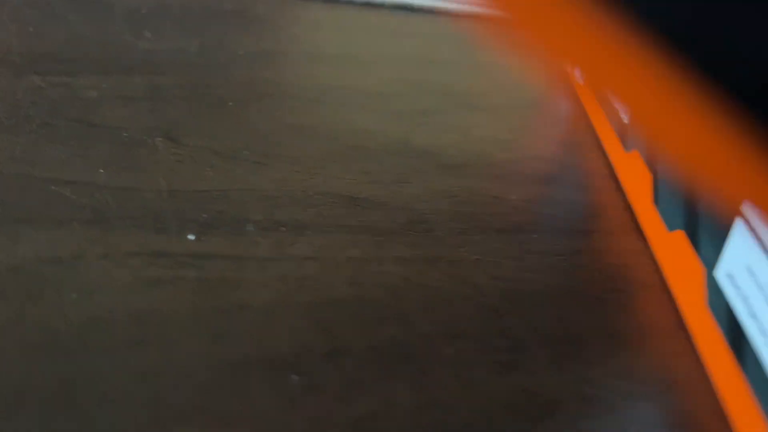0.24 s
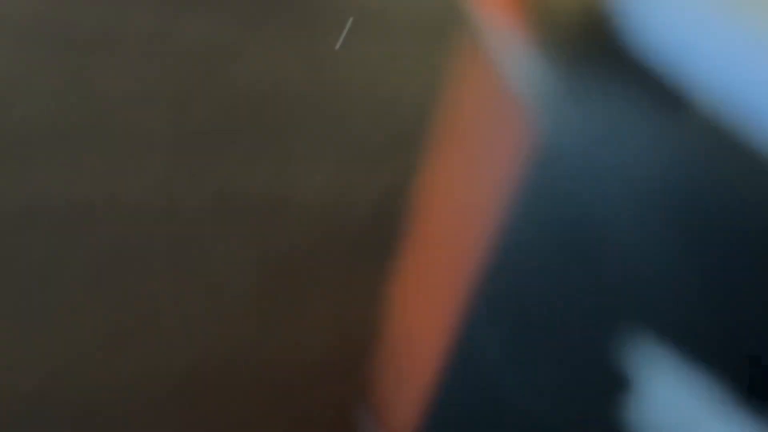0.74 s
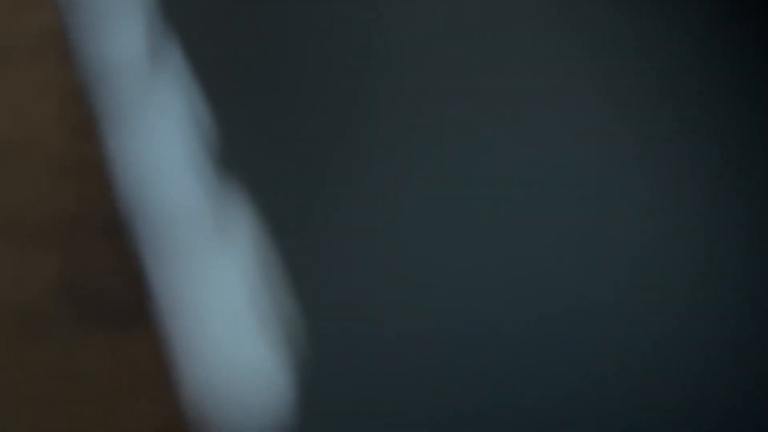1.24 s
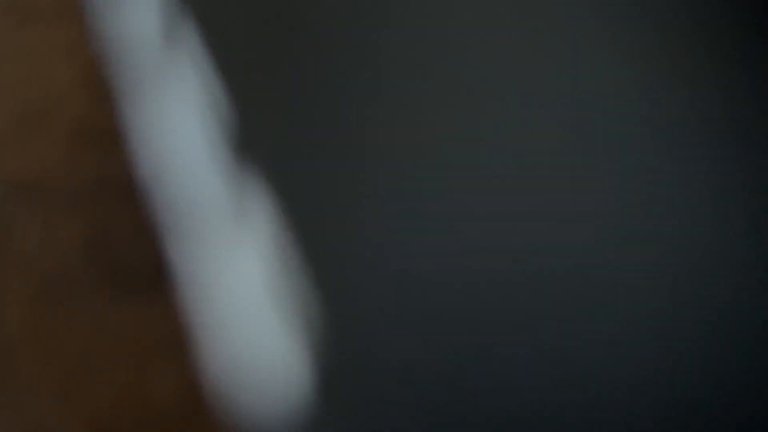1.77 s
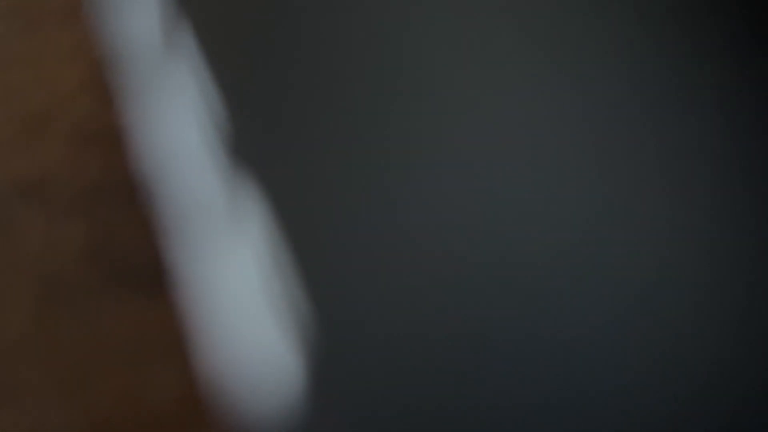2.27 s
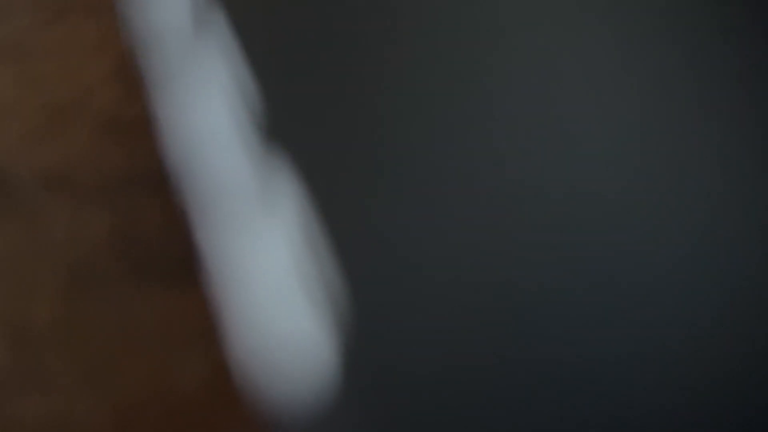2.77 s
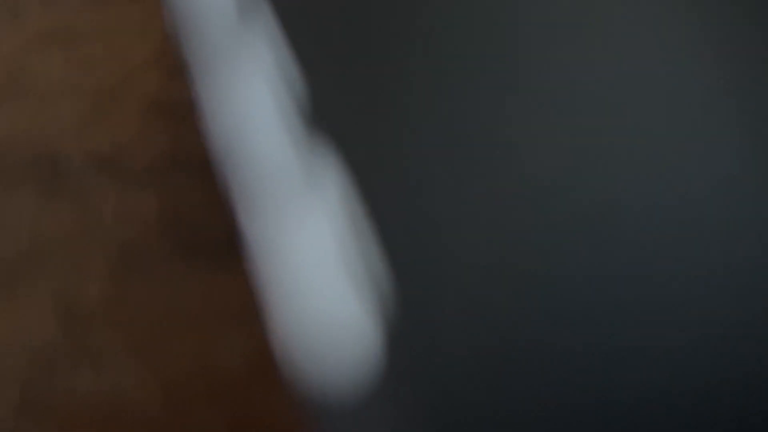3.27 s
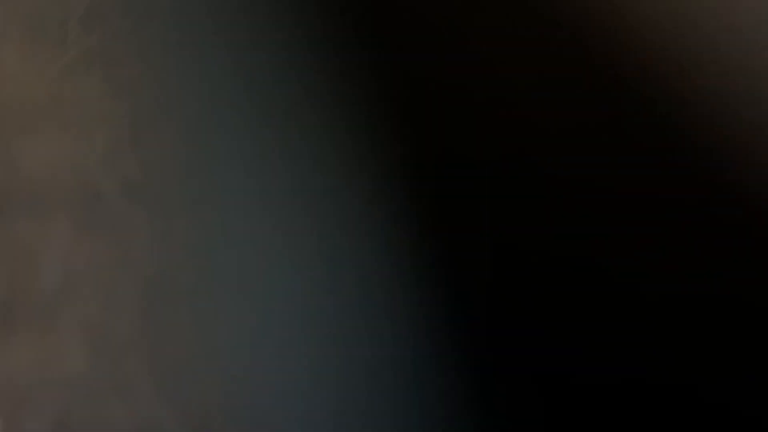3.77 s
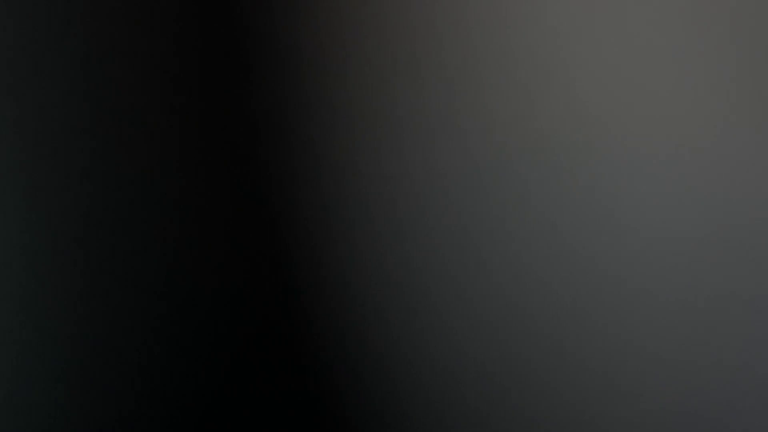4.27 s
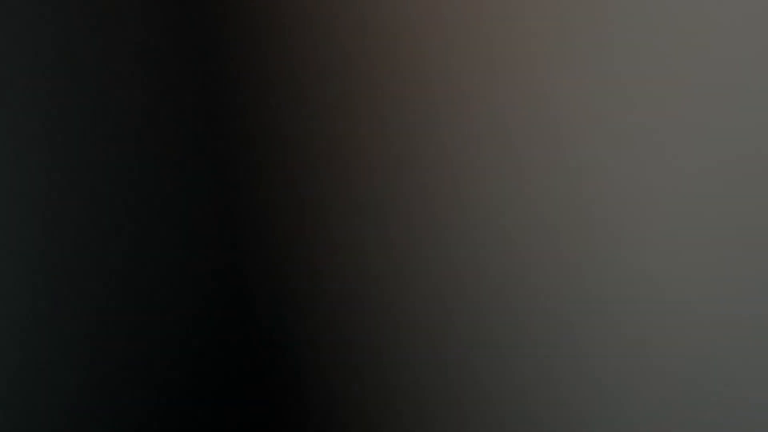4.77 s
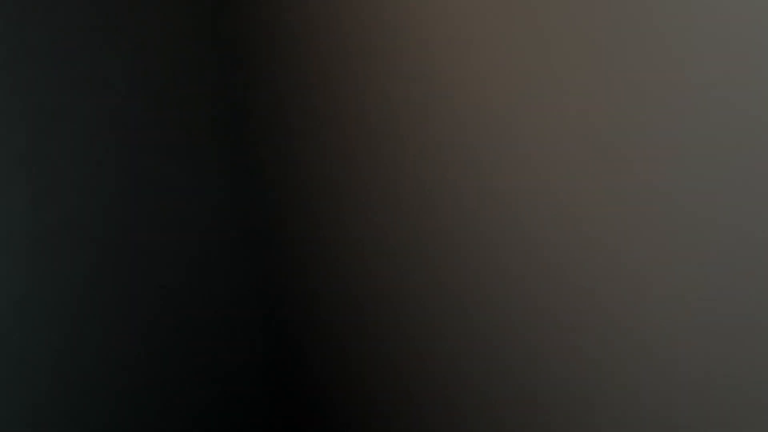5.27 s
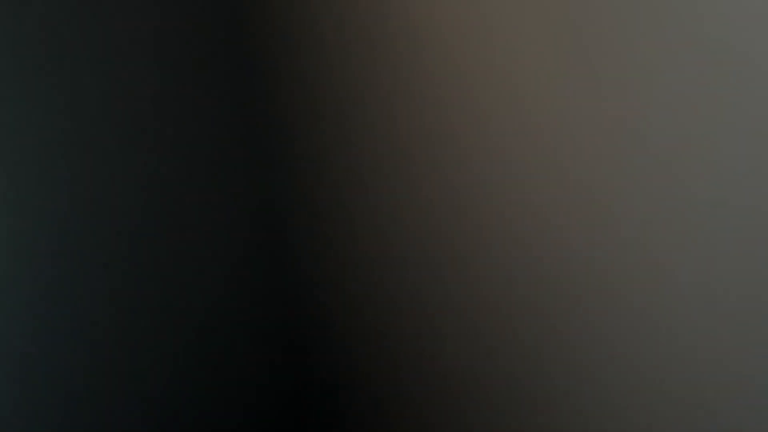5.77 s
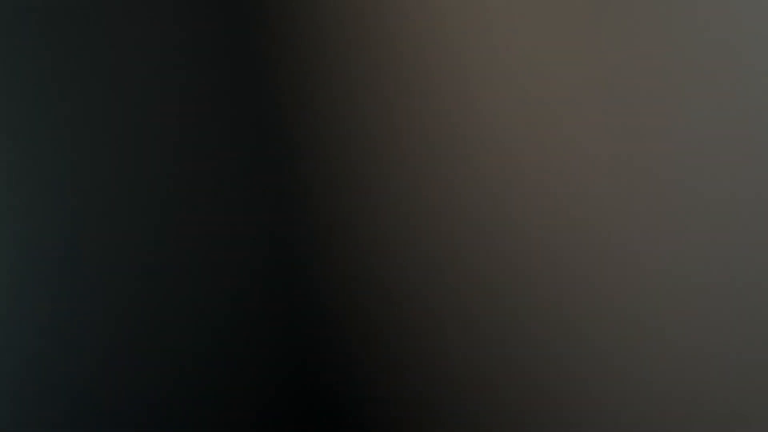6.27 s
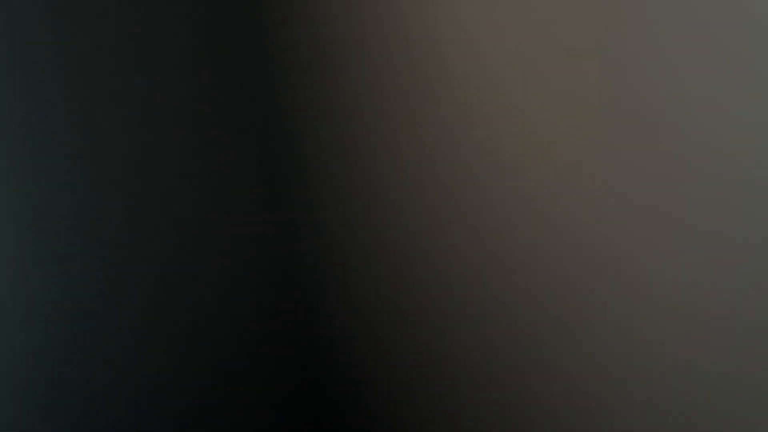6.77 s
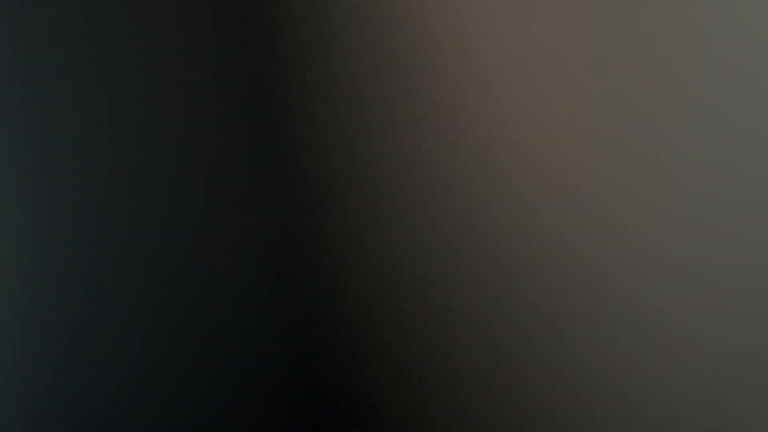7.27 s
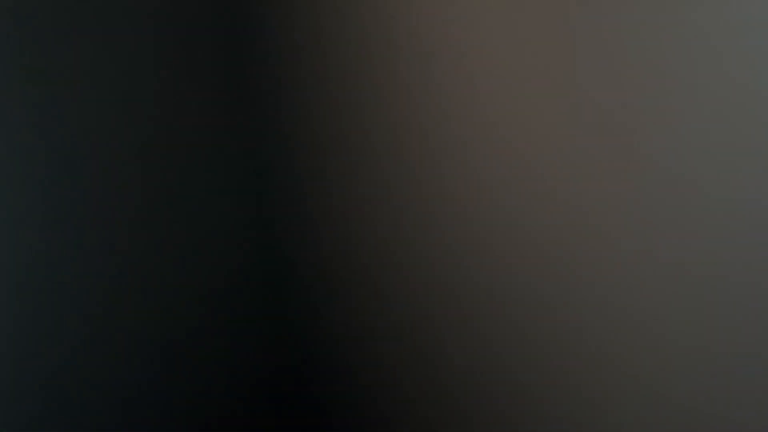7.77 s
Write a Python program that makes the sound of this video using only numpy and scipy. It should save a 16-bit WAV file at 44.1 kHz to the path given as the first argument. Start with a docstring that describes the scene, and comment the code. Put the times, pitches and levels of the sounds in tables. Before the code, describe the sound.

A cardboard box is shoved and knocked shut, then a felt marker rubs short squeaky-dry strokes on it, with soft panel taps between.

```python
"""Felt marker on a cardboard box

A felt marker writes short strokes on a cardboard box, right beside the microphones, in a quiet room.
First the box is slid into place and its lid knocks shut; between strokes the hand shifts and panels flex and tap.
Rubbing is noise shaped by felt, card and panel; taps cross the board treble first, as quick downward chirps."""
import sys
import numpy as np
from scipy import signal
from scipy.fft import rfft, irfft, next_fast_len
from scipy.io import wavfile
from scipy.ndimage import map_coordinates

SR = 44100
rng = np.random.default_rng(int(sys.argv[2]) if len(sys.argv) > 2 else 0)


def unload_wav(signal):
    """Save mono or channel-first audio to the path in sys.argv[1] as 16-bit WAV at rate SR, clipped to [-1, 1]."""
    wavfile.write(
        sys.argv[1],
        SR,
        np.round(np.clip(np.atleast_2d(signal).T, -1, 1) * 32767).astype(np.int16),
    )


N = 354123  # length of the sound [samples]

# strokes of the marker: (start [s], length [s], share of the length at top speed [0-1], panel ring [dB],
# felt hiss [dB], flexing [dB], upper modes against lower modes [dB])
MARKER_STROKES = [(2.462, 0.12, 0.14, -53.5, -76, -60, -13), (2.561, 0.16, 0.29, -40.5, -46.5, -52.5, -5),
                  (2.728, 0.11, 0.13, -33.5, -42, -53, -9), (2.772, .11, 0.54, -37, -56.5, -48, -6),
                  (2.889, 0.26, 0.38, -39, -45, -56, -4.5), (3.031, .17, 0.61, -34.5, -40, -57, -2),
                  (3.66, 0.081, 0.48, -39.5, -50.5, -43.5, -3.5),
                  (3.745, 0.14, .46, -34, -45.5, -43.5, -2.5), (3.826, 0.22, 0.47, -39, -48, -51.5, -7.5),
                  (3.961, 0.17, 0.7, -36, -43.5, -50, -1.5), (4.689, .12, 0.93, -45.5, -66, -54, -1),
                  (4.815, 0.11, .31, -40, -47, -51.5, 3.5), (4.933, 0.087, 0.28, -36, -51.5, -56, -5),
                  (4.985, 0.16, 0.55, -39, -55.5, -53.5, -7.5), (5.264, 0.13, 0.5, -38.5, -47.5, -42.5, 2),
                  (5.606, 0.17, .67, -38.5, -51.5, -55, -2.5), (5.803, 0.1, 0.25, -35.5, -39.5, -44, 2.5),
                  (6.145, 0.16, 0.4, -34.5, -45, -54, 1.5), (6.302, 0.13, .28, -38, -46, -51.5, 3),
                  (6.58, 0.13, 0.37, -40.5, -54, -54, 4), (6.852, 0.11, 0.32, -43, -56.5, -50, 2),
                  (6.981, 0.12, .15, -34, -53, -54, -2), (7.056, 0.15, .44, -40.5, -47, -54.5, 3.5),
                  (7.145, .185, 0.47, -35, -44.5, -48.5, 2.5), (7.835, .25, 0.39, -35.5, -37.5, -46.5, 0.5)]
# pushes of the box and brushes of the hand: (start [s], length [s], share of the length at top speed [0-1],
# scrape [dB], hiss [dB], flexing [dB])
BOX_SLIDES = [(0, 0.11, 0.053, -51.5, -58, -47), (0.148, 0.1, 0.38, -52.5, -56, -44.5),
              (0.285, 0.096, 0.29, -44, -49, -32.5), (.39, 0.32, 0.076, -50.5, -59.5, -49),
              (0.559, 0.2, 0.37, -47, -52.5, -40.5), (0.69, 0.24, .1, -43, -45, -50.5),
              (0.786, 0.19, 0.84, -45, -43.5, -45.5), (1.047, 0.097, 0.59, -54, -77, -43),
              (1.137, 0.49, 0.33, -60.5, -81.5, -64), (1.387, 0.078, 0.66, -41, -56.5, -47.5),
              (1.463, 0.17, 0.46, -43.5, -49, -49.5), (1.684, 0.23, 0.16, -56.5, -71, -56.5),
              (3.203, 0.11, 0.34, -51, -59.5, -43.5), (3.264, 0.091, 0.48, -41.5, -52, -58),
              (3.388, 0.079, 0.29, -53.5, -62.5, -46), (3.47, .15, 0.48, -44.5, -63.5, -45.5),
              (4.116, 0.072, 0.17, -42, -64.5, -49.5), (4.195, 0.16, 0.44, -41, -51.5, -45),
              (4.435, 0.2, 0.19, -52.5, -88, -56), (5.437, .07, .3, -56, -82, -57),
              (5.885, 0.067, 0.31, -44, -72, -42), (7.32, 0.11, 0.13, -49, -63, -55),
              (7.436, 0.089, 0.2, -46, -61, -44), (7.557, 0.27, 0.96, -64, -83, -54.5)]
# taps on the board: (arrival of the 1 kHz wave [s], thud peak [dB], thud centre [Hz], crack peak [dB],
# travel time of the 1 kHz wave [s])
BOARD_TAPS = [(0.004, -25, 204, -36.5, 0.0036), (0.2511, -25.5, 260, -27, 0.006),
              (0.3084, -18, 380, -37, 0.0085), (0.3405, -27, 430, -47, 0.005),
              (0.4069, -30, 90, -27.5, 0.0058), (0.4229, -26.5, 90, -51, 0.006),
              (0.458, -30.5, 364, -36, 0.0035), (0.5819, -19.5, 470, -22, 0.005),
              (0.589, -25, 91, -28, 0.0034), (0.7022, -11.5, 565, -9.5, 0.00095),
              (0.7122, -9, 257, -20.5, 0.0045), (0.7211, -20.5, 250, -22.5, 0.00099),
              (1.029, -34, 300, -35.5, 0.0019), (1.045, -26.5, 150, -49, 0.0039),
              (1.075, -35, 87, -32.5, 0.004), (1.392, -30.5, 149, -39.5, 0.0045),
              (1.4403, -34, 510, -31, 0.0011), (1.5098, -31, 112, -40, 0.006),
              (1.7899, -31, 350, -58, 0.001), (2.1376, -44, 218, -53, 0.006),
              (2.4734, -34, 180, -45, 0.0028), (2.7375, -29.5, 597, -41, 0.0021),
              (2.985, -12.5, 355, -26, 0.0011), (2.991, -16, 358, -34, 0.0023),
              (2.995, -21.5, 360, -28, 0.006), (3.0033, -26, 430, -30, 0.0038),
              (3.0189, -20, 353, -41, 0.0045), (3.206, -37, 610, -35, 0.003),
              (3.2232, -34, 150, -44, 0.0045), (3.2472, -28.5, 130, -40, 0.0012),
              (3.282, -36, 90, -37, 0.002), (3.3637, -29.5, 300, -38, 0.003),
              (3.3747, -28, 210, -55, 0.0007), (3.3995, -34.5, 250, -57, 0.006),
              (3.4394, -34, 110, -47, 0.005), (3.5236, -26.5, 151, -43, 0.0028),
              (3.596, -31.5, 146, -35.5, 0.0045), (3.656, -28, 364, -44, 0.0045),
              (4.116, -36, 109, -48, 0.0041), (4.2136, -36, 130, -35, 0.00447),
              (4.4578, -37, 507, -59, 0.0034), (5.2668, -34, 250, -56, 0.0045),
              (5.2817, -29, 357, -49, 0.0045), (5.3757, -32.5, 298, -46, 0.0045),
              (5.537, -49, 210, -58, 0.006), (5.6054, -30, 302, -52, 0.0022),
              (5.8808, -30, 605, -38, 0.0068), (5.912, -30.5, 430, -42, 0.00294),
              (5.9445, -29, 356, -46, 0.004), (6.0688, -37.5, 300, -52, 0.0039),
              (6.1244, -28.5, 610, -51, 0.002), (6.584, -33.5, 253, -57, 0.00406),
              (6.835, -31, 213, -43.5, 0.0045), (6.9667, -27, 355, -38, 0.0031),
              (7.4288, -22.5, 610, -45, 0.00066), (7.4538, -33, 430, -36, 0.004),
              (7.4752, -16.5, 314, -30.5, 0.0029), (7.4834, -20.5, 149, -44, 0.00083),
              (7.7022, -27, 300, -43.5, 0.0045), (7.7522, -40, 207, -44, 0.0021),
              (7.7785, -21, 500, -50, 0.0039), (7.8127, -31, 610, -52, 0.00078),
              (7.8287, -33, 90, -45, 0.0065)]
# sharp ticks of cardboard edges and of the tip landing: (time [s], relative strength [dB])
EDGE_TICKS = [(0.2517, -31), (0.308, -36), (0.405, -29.5), (0.4548, -28.5), (0.5794, -19), (0.6999, -16.5),
              (1.0275, -45), (1.0733, -32.5), (1.2211, -51), (1.3908, -46), (1.82, -25), (2.4714, -46),
              (2.7345, -22), (3.2049, -30), (3.2235, -34), (4.1525, -42), (4.21, -37), (5.2674, -48),
              (5.512, -53), (5.8102, -32.5), (6.1564, -35), (6.5824, -42), (6.9662, -37.5), (7.3895, -48),
              (7.4278, -26), (7.449, -27), (7.4734, -20.5), (7.636, -41.5), (7.8265, -45)]
# where the box sits, for its taps and flexing: (time [s], left minus right [dB], delay of left taps [s])
BOX_PLACE = [(0, 5, .00018), (1.0, 5.5, .00018), (1.4, -1, 0), (2.6, -2, 0), (3.2, -.5, 0), (5.5, -2, 0),
             (8, -1.5, .00008)]
# narrow panel modes under the tip: (frequency [Hz], width [Hz], left [dB], right [dB])
PANEL_MODES = [(804.4, 34, 5, 14.5), (858, 23, 8, 15), (892.4, 10.6, 18.5, 10), (977, 16.4, 9, 17),
               (1082, 30, 14, 10), (1109.3, 47, 11.5, -2.5), (1202, 35, 4, 4.5), (1311, 34, 7, -29),
               (1323, 54, 7.5, -14.5), (1516, 66, 3, -6.5), (1980, 150, -6, -28.5), (2510, 150, -28, -10)]
# broad response of the board to felt friction: (frequency [Hz], left [dB], right [dB])
FELT_RING_COLOUR = [(100, -18, -8), (300, -5, -4.5), (505, -8.5, 2), (734, -22, -5.5), (1176, 1.5, 2),
                    (1660, -11.5, -10), (2130, -11, -14.5), (3050, -17.5, -22), (3920, -19.5, -27),
                    (8640, -45, -64.5)]
# colour of the felt's hiss: (frequency [Hz], left [dB], right [dB])
FELT_HISS_COLOUR = [(1210, -32.5, -10), (2530, 5.5, 5), (4250, -1.5, -4.5), (5020, 0, -3), (6660, 9.5, 2),
                    (7230, -1, -4), (8700, 5, 5), (10750, -8, -9), (10840, 3.5, -0.5), (14200, -4, -3.5),
                    (15660, -6, -9)]
# colour of the dull card scrape: (frequency [Hz], left [dB], right [dB])
CARD_SCRAPE_COLOUR = [(82.5, -17, -1.5), (357, -1.5, -4.5), (700, 2, 4), (1210, 6, 1), (1580, -1.5, -6),
                      (2160, -8, -8.5), (3345, -18, -20), (9070, -38, -43.5)]
# colour of the dry card hiss: (frequency [Hz], left [dB], right [dB])
CARD_HISS_COLOUR = [(1500, -20, -20), (3100, -7, -9), (4500, 0, -5), (5600, -1, -7), (7500, -2, -4),
                    (10000, -5, -5), (11700, -1, -1), (13500, -7, -7), (15400, -8, -8)]
# colour of the flexing panels: (frequency [Hz], level [dB])
FLEXING_COLOUR = [(20, -38.5), (40, -1.5), (60, 6), (120, 1), (250, -3), (450, -0.5), (700, -13.5),
                  (1500, -27), (4000, -69)]
# colour of the ticks: (frequency [Hz], gain [dB])
TICK_GAIN = [(300, 6), (1500, 4), (3500, 0.5), (8000, -3.5), (15000, -11)]
# colour of the quiet room's own sound: (frequency [Hz], level [dB])
AIR_COLOUR = [(20, -5), (50, 5.5), (90, -26), (128, 25.5), (190, -43), (400, -29.5), (800, -43),
              (2050, -17.5), (8000, -56.5), (16000, -89.5)]
# how long the room takes to fade by 60 dB: (frequency [Hz], time [s])
ROOM_FADE = [(100, 0.12), (1000, 0.25), (4000, 0.25), (14000, 0.085)]
# how alike left and right are before placing and recording: (frequency [Hz], correlation [0-1])
LEFT_RIGHT_ALIKE = [(60, 1), (300, 0.75), (1300, 0.41), (2800, 0.091), (6500, 0.41), (8500, 0.22),
                    (15000, 0.073)]
# phase of the shared treble between the channels: (frequency [Hz], phase [turns])
TREBLE_TWIST = [(8300, 0), (10250, .5), (12100, 1), (13950, 1.5), (15700, 2)]
# colour of the microphones' own hiss: (frequency [Hz], level [dB])
MIC_HISS_COLOUR = [(500, -2), (5000, 2.5), (9000, -3), (15000, -11)]

# how much weaker each sound is when the tip or card is nearly at rest [dB]
RING_SLOW_DB, FELT_SLOW_DB = 13.5, 26.5
SCRAPE_SLOW_DB, CARD_SLOW_DB, FLEX_SLOW_DB = 8.5, 12, 4
# every move takes hold quickly [s] and dies away after its end [dB/s]
CONTACT_S, RELEASE_DB_PER_S = 0.0058, 174.5
GRIP_DB = -62  # the holding hand never lets the flexing stop
# the panels settle after a tap: level against its thud [dB], and decay [dB/s]
SETTLE_DB, SETTLE_DB_PER_S = -20.5, 258.5
AIR_DB, MIC_HISS_DB, ROOM_DB = -63.5, -86, -20.0
SHARED_HZ, TOP_HZ = 8000, 15850  # treble above the first is shared by both sides; the band ends at the second


def marker(split_hz=1100):
    """The dragging felt hisses and sets the panel ringing; where it drags decides which modes ring most."""
    *_, ring_db, hiss_db, _, upper_db = np.transpose(MARKER_STROKES)
    # lower and upper modes together have the power of the whole ring
    lower_db = ring_db - 10 * np.log10(1 + amp(upper_db) ** 2)
    force = friction(slip_rate=420, slip_db=2, snag_rate=760, snag_share=0.19)

    def lower_share(hz):
        """Keep the low modes and fade out those above the split."""
        return 1 / (1 + (hz / split_hz) ** 10)

    # the few low modes ring steadily; the crowded high ones come and go
    lower = unit(filtered(force, lambda hz: panel(hz) * lower_share(hz)))
    shifting = patchy(force, depth_db=6.0, patch_hz=89.1, patch_rate=14)
    upper = unit(filtered(shifting, lambda hz: panel(hz) * (1 - lower_share(hz))))
    lower_ring = moves(MARKER_STROKES, lower_db, RING_SLOW_DB) * lower
    upper_ring = moves(MARKER_STROKES, lower_db + upper_db, RING_SLOW_DB) * upper
    hiss = coloured(patchy(force, depth_db=3.5, patch_hz=167.8, patch_rate=16), FELT_HISS_COLOUR)
    return lower_ring + upper_ring + moves(MARKER_STROKES, hiss_db, FELT_SLOW_DB) * hiss


def panel(hz):
    """The board's narrow modes on top of its broad response, at each microphone."""
    modes = 0
    for k, (centre, width, left, right) in enumerate(PANEL_MODES):
        resonance = 1j * hz * width / (centre ** 2 - hz ** 2 + 1j * hz * width)
        # neighbouring modes push in opposite directions
        modes = modes + (-1) ** k * amp([[left], [right]]) * resonance
    return modes + amp(along(FELT_RING_COLOUR, hz))


def sliding(uneven_db=2.7, uneven_rate=45):
    """Card rubbing on card and skin under uneven pressure: a duller scrape under a dry hiss."""
    *_, scrape_db, hiss_db, _ = np.transpose(BOX_SLIDES)
    force = friction(slip_rate=220, slip_db=2.0, snag_rate=400, snag_share=.3)
    force = patchy(force, depth_db=3.0, patch_hz=203.0, patch_rate=9)
    force = force * amp(uneven_db * wobble(uneven_rate))
    scrape = moves(BOX_SLIDES, scrape_db, SCRAPE_SLOW_DB) * coloured(force, CARD_SCRAPE_COLOUR)
    hiss = moves(BOX_SLIDES, hiss_db, CARD_SLOW_DB) * coloured(force, CARD_HISS_COLOUR)
    return scrape + hiss


def friction(slip_rate, slip_db, snag_rate, snag_share):
    """Rubbing force: fine noise that grips and slips, plus single fibres that snag and let go."""
    fine = rng.standard_normal((2, N)) * amp(slip_db * wobble(slip_rate))
    snag_here = rng.random(N) < snag_rate / SR  # snag_rate is the average number a second
    snags = rng.uniform(-0.84, 1, (2, N)) * snag_here
    return spread(fine + snag_share * unit(snags))


def patchy(x, depth_db, patch_hz, patch_rate, size=512):
    """As the contact moves over the board it favours now these modes, now those."""
    hz, t, z = signal.stft(x, SR, nperseg=size)
    place = np.meshgrid(hz / patch_hz, t * patch_rate, indexing="ij")
    # a random map over frequency and time, read smoothly
    field = map_coordinates(rng.standard_normal((256, 256)), place, order=1, mode="wrap")
    return signal.istft(z * amp(depth_db * unit(field)), SR, nperseg=size)[1][:, :N]


def moves(table, levels_db, slow_db):
    """Gain over hand moves: each takes hold, speeds up, slows down and lets go; faster is louder."""
    power, t = np.zeros(N + SR), np.arange(SR) / SR
    for (start, length, crest, *_), db in zip(table, levels_db):
        top_s = np.clip(crest, .05, .95) * length  # keep top speed away from both ends
        speed = np.sin(np.pi / 2 * np.interp(t, [0, top_s, length], [0, 1, 0]))
        release_db = RELEASE_DB_PER_S * np.maximum(t - length, 0)
        gain = np.minimum(t / CONTACT_S, 1) * amp(db - slow_db * (1 - speed) - release_db)
        power[round(start * SR):][:SR] += gain ** 2
    return np.sqrt(power[:N])


def taps(thud_octaves=0.68, crack_hz=1200, crack_octaves=0.38, edge_db=-12, edge_delay=0.004086,
         size=4096, lead_count=1000):
    """A low thud and a woody crack cross the board and come back weaker from its edge."""
    out, hz = np.zeros((2, N + 2 * size)), np.fft.rfftfreq(size, 1 / SR)
    lag = curves(BOX_PLACE)[1]
    for s, thud_db, thud_hz, crack_db, travel in BOARD_TAPS:
        start = round(s * SR)
        # the lead leaves room for treble that arrives before the 1 kHz wave
        cycles = bending(hz, travel) + hz * lead_count / SR + rng.random()
        # the two microphones face different parts of the bending board
        apart = np.pi * hz * lag[start] + rng.uniform(-.6, .6)
        wave = np.exp(-2j * np.pi * cycles - 1j * np.array([apart, -apart]))
        detour = edge_delay * (.5 + rng.random())
        echo = amp(edge_db) * np.exp(-2j * np.pi * (bending(hz, detour) + hz * detour))
        wave = wave * (1 + echo)
        thud, crack = (thud_db, thud_hz, thud_octaves), (crack_db, crack_hz, crack_octaves)
        for db, centre_hz, octaves in (thud, crack):
            bell = np.exp(-.5 * (np.log2((hz + 1) / centre_hz) / octaves) ** 2)
            chirp = irfft(wave * bell, size)
            peak = np.abs(signal.hilbert(chirp)).max()
            out[:, start:start + size] += amp(db) * chirp / peak
    return out[:, lead_count:][:, :N]


def bending(hz, travel):
    """Cycles of delay, beside the 1 kHz wave: bending waves speed up with the root of frequency."""
    return travel * (2 * np.sqrt(1000 * hz) - hz)


def ticks(t60=0.02, size=2048):
    """An edge catches and snaps free: a crack of a few milliseconds, made of fading noise."""
    out, t = np.zeros((2, N + size)), np.arange(size) / SR
    for s, db in EDGE_TICKS:
        fade = amp(db - 11 - 60 * t / t60)  # noise peaks stand well above its average level
        out[:, round(s * SR):][:, :size] += fade * rng.standard_normal((2, size))
    return filtered(spread(out[:, :N]), lambda hz: amp(along(TICK_GAIN, hz)))


def flexing():
    """The panels give in small soft jerks under every move of the hand, and settle after every tap."""
    power, t = np.full(N + SR, amp(GRIP_DB) ** 2), np.arange(SR) / SR
    for table in MARKER_STROKES, BOX_SLIDES:
        flex_db = [row[5] for row in table]
        power[:N] += moves(table, flex_db, FLEX_SLOW_DB) ** 2
    settle = np.minimum(t / CONTACT_S, 1) * amp(SETTLE_DB - SETTLE_DB_PER_S * t)
    for s, thud_db, *_ in BOARD_TAPS:
        power[round(s * SR):][:SR] += (amp(thud_db) * settle) ** 2
    jerks = friction(slip_rate=60, slip_db=4.5, snag_rate=160, snag_share=0.48)
    return np.sqrt(power[:N]) * coloured(jerks, FLEXING_COLOUR)


def room(x):
    """A small furnished room: a tail of fading noise, whose treble dies first."""
    hz, t, z = signal.stft(rng.standard_normal((2, SR // 2)), SR, nperseg=256)
    fade = amp(-60 * t / along(ROOM_FADE, hz).T)
    tail = signal.istft(z * fade, SR, nperseg=256)[1]
    return signal.fftconvolve(x, tail / np.linalg.norm(tail[0]), axes=1)[:, :N]


def air():
    """The quiet room's own steady sound: noise, strongest in a low hum."""
    return amp(AIR_DB) * coloured(spread(rng.standard_normal((2, N))), AIR_COLOUR)


def microphone_hiss():
    """The microphones' own faint hiss: separate noise on each side."""
    return amp(MIC_HISS_DB) * coloured(rng.standard_normal((2, N)), MIC_HISS_COLOUR)


def amp(db):
    """Decibels to gain."""
    return 10 ** (np.asarray(db) / 20)


def unit(x):
    """Scale to rms (average strength) 1."""
    return x / np.sqrt(np.mean(x ** 2) + 1e-20)


def along(points, hz):
    """Each column of a table over frequency, read on a log axis."""
    f, *cols = np.transpose(points)
    return np.array([np.interp(np.log(hz + 1), np.log(f), c) for c in cols])


def curves(rows):
    """One value per sample for each column after the time."""
    s, *cols = np.transpose(rows)
    return [np.interp(np.arange(N) / SR, s, c) for c in cols]


def wobble(rate):
    """A smooth random curve, with rate random points a second."""
    points = rng.standard_normal(int(N * rate / SR) + 4)
    return map_coordinates(points, [np.arange(N) * rate / SR])


def filtered(x, response):
    """Shape x by a response that depends on frequency."""
    size = next_fast_len(N + 8192)
    return irfft(rfft(x, size) * response(np.fft.rfftfreq(size, 1 / SR)), size)[..., :N]


def coloured(x, spectrum):
    """Shape x by a table of levels over frequency, then scale it to rms 1."""
    return unit(filtered(x, lambda hz: amp(along(spectrum, hz))))


def spread(pair):
    """Two unrelated signals become left and right, most alike in the bass."""
    def shares(hz):
        """Split between middle and side that gives the wanted likeness."""
        turn = np.arccos(np.clip(along(LEFT_RIGHT_ALIKE, hz)[0], -1, 1)) / 2
        return np.array([np.cos(turn), np.sin(turn)])
    mid, side = filtered(pair, shares)
    return np.array([mid + side, mid - side])


def scene():
    """Marker and box close by, the room faint behind them."""
    place_db = curves(BOX_PLACE)[0]
    box = (taps() + flexing()) * amp([place_db / 2, -place_db / 2])
    near = marker() + sliding() + box + ticks()
    return near + amp(ROOM_DB) * room(near) + air() + microphone_hiss()


def record(dry):
    """The top treble is nearly one signal, turned in phase between the channels, up to the band limit."""
    size = next_fast_len(N + 8192)
    hz, (left, right) = np.fft.rfftfreq(size, 1 / SR), rfft(dry, size)
    shared = 1 - 1 / (1 + (hz / SHARED_HZ) ** 20)
    mid = (left + right) / 2 * np.sqrt(1 + shared)
    side = (left - right) / 2 * np.sqrt(1 - shared)
    turn = np.exp(1j * np.pi * along(TREBLE_TWIST, hz)[0])  # half the twist for each side
    band = 1 / (1 + (hz / TOP_HZ) ** 200)
    return irfft(np.array([(mid + side) / turn, (mid - side) * turn]) * band, size)[:, :N]


dry = scene()
out = record(dry)
unload_wav(out)
```